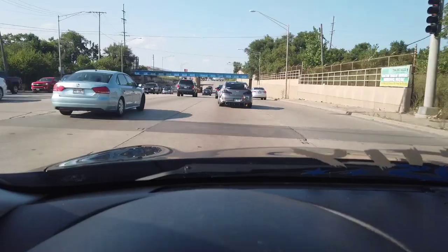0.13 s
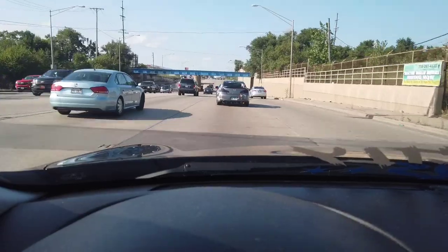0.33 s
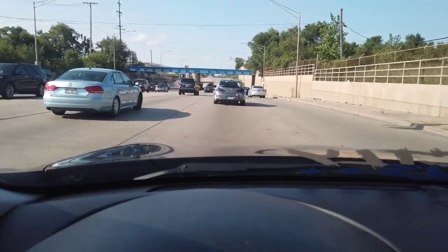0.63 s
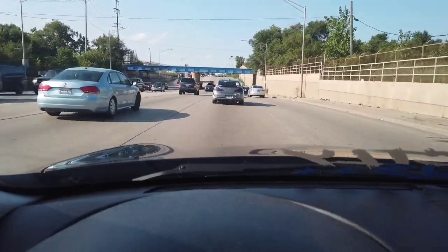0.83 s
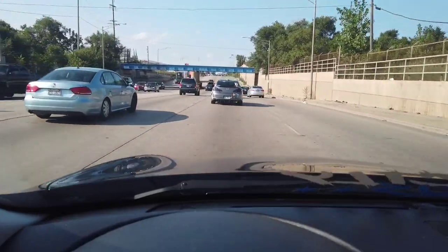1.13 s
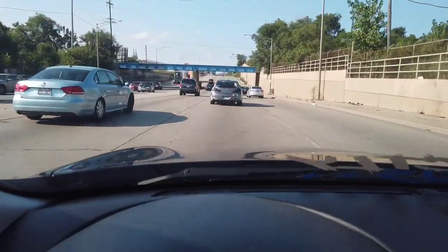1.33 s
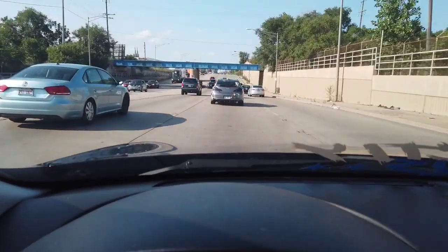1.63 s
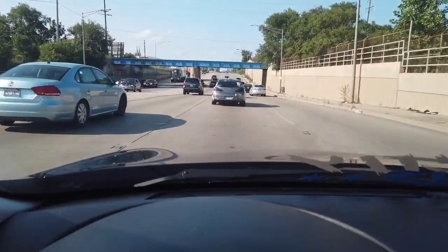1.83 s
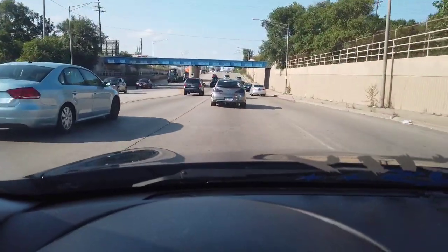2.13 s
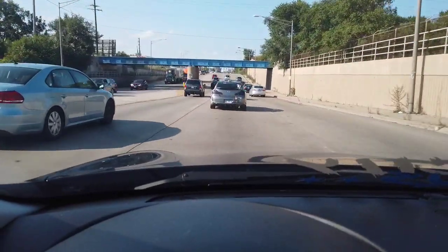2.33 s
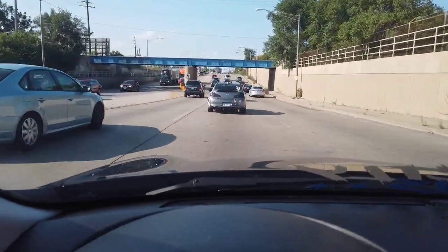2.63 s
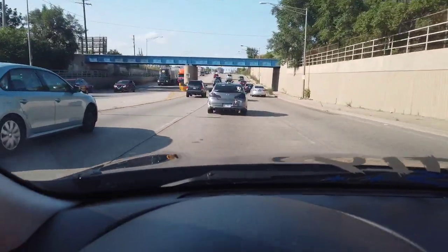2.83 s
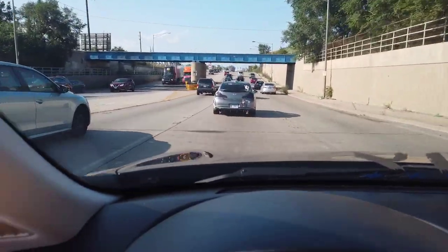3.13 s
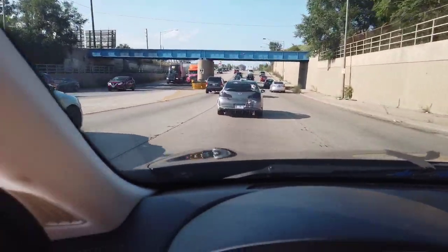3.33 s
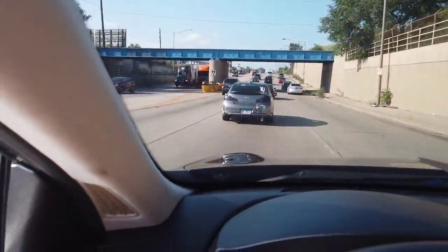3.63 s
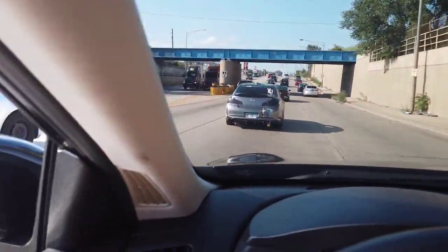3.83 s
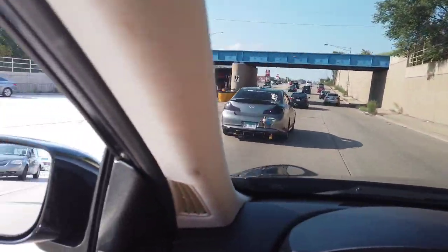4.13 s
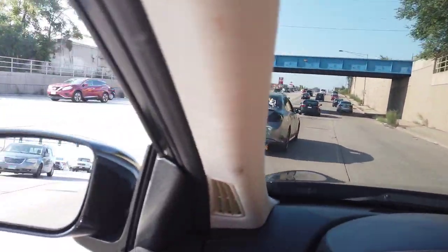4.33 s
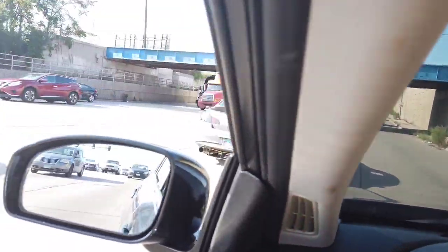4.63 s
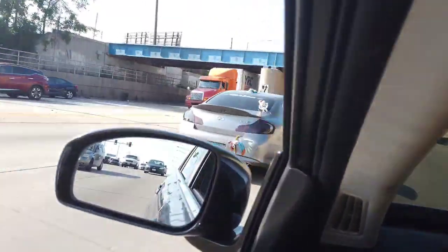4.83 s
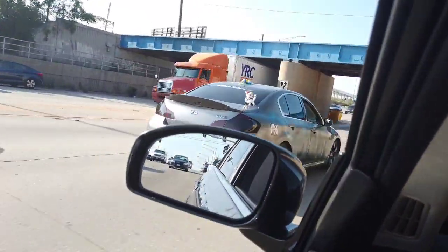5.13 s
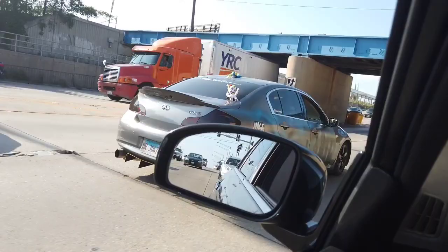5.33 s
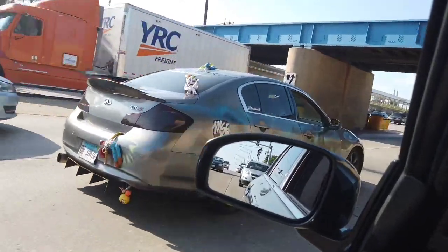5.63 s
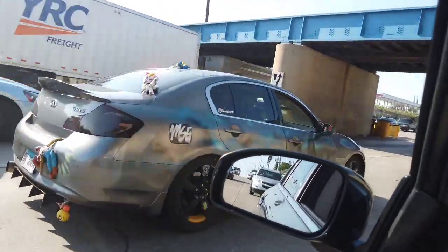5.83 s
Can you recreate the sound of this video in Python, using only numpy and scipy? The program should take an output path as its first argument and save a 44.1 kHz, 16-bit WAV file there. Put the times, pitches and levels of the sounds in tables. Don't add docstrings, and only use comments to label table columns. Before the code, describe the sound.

Heard from inside a car with the window open on a busy road: a smooth low engine drone climbs, drops away as the throttle closes, then briefly pulls again. Wind buffets and tyres roar throughout. A short high brake squeak and trim knocks follow; a second car's steady exhaust tone grows, then revs hard with a rasp, while a lorry whistles faintly and puffs air. Handheld stereo microphone turning towards the window.

```python
import sys
import numpy as np
from scipy import signal
from scipy.fft import rfft, irfft
from scipy.io import wavfile
from scipy.ndimage import uniform_filter1d

SR = 44100
rng = np.random.default_rng(int(sys.argv[2]) if len(sys.argv) > 2 else 0)


def gain_from_db(level_db):
    decades = np.asarray(level_db, float) / 20
    return 10 ** decades


def output_pcm(signal):
    pcm = np.clip(np.atleast_2d(signal).T, -1, 1) * 32767
    wavfile.write(sys.argv[1], SR, np.round(pcm).astype(np.int16))


N = 264600

# (time [s], firing rate [Hz], firing tone [dB], throttle [0-1])
DRONE_PULLS = [
    [(0.0, 128.7, -14.5, .9), (0.12, 134, -15, .9), (0.29, 136, -14, 1), (0.48, 143.5, -12, .6),
     (1.38, 150, -13.3, .2), (1.5, 146.6, -13.5, .1), (1.57, 138, -21.5, 0), (1.8, 131.8, -27, 0),
     (2.25, 130.8, -42, 0)],
    [(2.75, 93.3, -46, .2), (2.84, 102.8, -28.5, .2), (2.95, 113.5, -22, .6), (3.2, 135.1, -15.5, 1.05),
     (3.38, 143.3, -14.3, .9), (3.5, 141.5, -14, .85), (3.57, 139, -16.5, .6), (3.65, 128.2, -26, .25),
     (3.83, 126.1, -53, 0)],
]
# (frequency [Hz], level [dB])
CABIN_RESPONSE = [(200, -8), (250, -26), (300, -29), (370, -25), (405, -20.5), (425, -29), (575, -29.5),
                  (600, -33)]
# (time [s], firing tone [dB])
CRUISE_LEVEL = [(0.0, -26), (0.2, -39), (0.65, -48), (0.95, -35), (2.62, -35), (2.76, -27), (3.2, -29.5),
                (3.4, -36), (3.7, -31), (4.38, -29), (4.47, -22.5), (4.74, -17.5), (5.015, -16.5),
                (5.028, -28), (5.1, -27), (5.165, -35)]
# (time [s], firing rate [Hz], firing tone [dB], pipe pressure [0-1])
REV_COURSE = [
    (5.18, 165.9, -15.5, .1),
    (5.215, 171, -14, .2),
    (5.245, 176, -15, 1),
    (5.34, 190.9, -15.5, 1),
    (5.49, 223.5, -15, 1.05),
    (5.59, 246.4, -15.5, .62),
    (5.66, 255.3, -15.5, .4),
    (5.77, 243, -21.5, .1),
    (6.0, 226, -17.5, .1),
]
# (level [dB], lag [cycles])
BANK_TONES = [(0.1, -.175), (-11, .03)]
# (order [sixths of firing rate], level [dB])
CYLINDER_TONES = [(1, -18.5), (2, -18), (4, -9), (5, 2.1), (7, -3), (8, -3.5), (9, -8), (10, -11),
                  (11, -4.5), (13, -9), (14, -17)]
# (frequency [Hz], level [dB])
PIPE_COLOUR = [(450, -10), (600, 3), (700, 0), (800, 2.5), (900, 1), (1000, 0), (1150, -7), (1350, -28.5),
               (2000, -51)]
# (time [s], middle frequency [Hz], level [dB])
TURBO_WHISTLE = [
    (4.3, 7650, -64),
    (4.5, 7930, -58),
    (4.85, 8140, -58),
    (5.05, 8290, -56),
    (5.2, 8550, -55),
    (5.42, 8900, -54),
    (5.6, 9300, -51),
    (5.75, 9450, -52),
    (6, 9600, -58),
]
# (time [s], peak level [dB], rise [s per 10 dB], fall [s
# per 10 dB])
AIR_PUFFS = [
    (4.29, -63, .09, .2),
    (5.366, -56, .03, .03),
    (5.45, -51, .015, .1),
    (5.52, -46.5, .06, .2),
    (5.6, -47, .15, .07),
    (5.68, -55, .05, .2),
]
# (frequency [Hz], density [dB per Hz])
RELEASE_COLOUR = [(2060, -26.5), (3500, -10.5), (4340, -13), (6360, -5), (9080, -3.5), (11000, -4.5),
                  (12400, -2), (13600, -5.5), (15200, -6)]
# (time [s], peak level [dB], rise [s per 10 dB], fall [s per 10 dB])
BRAKE_SQUEAK = [
    (4.1, -56, .025, .035),
    (4.158, -45, .032, .03),
    (4.2, -59, .01, .2),
]
# (time [s], peak level [dB], ring [Hz], t60 [s])
TRIM_KNOCKS = [
    (2.405, -23, 959, 0.047),
    (4.652, -14, 830, 0.035),
    (4.707, -22.5, 739, 0.068),
    (5.229, -20, 684, 0.04),
               (3.447, -51, 5250, .04),
    (3.932, -28, 900, .03),
    (4.885, -28, 660, .04),
    (4.925, -28, 780, .04),
    (4.962, -27, 810, .04),
]
# (time [s], peak level [dB], rise and fall [s per 10 dB])
WINDOW_GUSTS = [(.36, -20.5, .22), (.52, -22, .12), (.85, -23, .2), (1.05, -17.5, .05), (1.27, -19, .08),
                (1.53, -22.5, .12), (1.75, -19.5, .1), (2.3, -23, .3), (2.54, -18.5, .09), (2.74, -20, .08),
                (2.96, -17.5, .13), (3.09, -20, .15), (3.37, -18, .14), (3.77, -20, .15),
                (3.95, -21.5, .25), (4.38, -22.5, .2), (4.85, -25, .4), (5.18, -26, .4)]
# (frequency [Hz], density [dB per Hz])
BUFFET_COLOUR = [(8.8, -30), (15, -3.5), (38, -7), (56, -9.5), (76, -18.5), (108, -21), (130, -17.5),
                 (170, -41), (290, -120)]
# (time [s], tyre roar [dB])
TRAFFIC_LEVEL = [
    (0, -38.5),
    (.6, -41.5),
    (2.1, -41.5),
    (2.9, -39),
    (3.75, -36.5),
    (4.3, -34.5),
    (4.7, -32.5),
    (5.2, -34.5),
    (5.27, -38.5),
    (6, -38.5),
]
# (frequency [Hz], density [dB per Hz])
TYRE_COLOUR = [(53, -32), (90, -8.5), (123, -9), (179, -2.5), (277, -22), (354, -15.5), (478, -21.5),
               (884, -19), (982, -17.5), (1320, -21.5), (1850, -23), (2320, -28.5), (2820, -32),
               (3670, -47.5), (6000, -55), (7800, -88.5), (13200, -120)]
# (frequency [Hz], density [dB per Hz])
INTAKE_COLOUR = [(2650, -35.5), (4500, -5.5), (5330, -10), (6270, -9.5), (7200, -6.5), (7810, -1),
                 (8560, 0.5), (10900, -9.5), (12000, -8.5), (13400, -4), (15200, -14.5)]
# (frequency [Hz], density [dB per Hz])
STREET_COLOUR = [(2060, -35), (3500, -8), (5380, -9), (5900, -9), (7100, -5), (8130, -4.5), (9030, -7),
                 (10600, -12), (13100, -11), (15200, -15)]
# (time [s], peak level [dB], rise [s per 10 dB], fall [s per 10 dB])
DRAUGHT_GUSTS = [
    (1.1, -48, 1, 1),
    (3.5, -36, .35, .2),
    (4.35, -40.5, .3, .35),
]
# (frequency [Hz], density [dB per Hz])
PORT_COLOUR = [(15, -1), (50, -4.5), (110, -12), (250, -31.5), (500, -73)]
# (frequency [Hz], likeness [0-1])
LIKENESS = [(60, 1), (110, .995), (200, .995), (380, 1), (690, 0.97), (1280, 0.95), (2360, 0.86),
            (4350, 0.13), (8020, 0.14), (14800, 0.35)]


def evened(x):
    return x / np.sqrt(np.mean(x ** 2) + 1e-20)


def blend(ends, share):
    return ends[0] + (ends[1] - ends[0]) * share


def read(points, hz):
    f, value = np.transpose(points)
    return np.interp(np.log(hz + 1), np.log(f + 1), value)


def follow(rows):
    s, *columns = np.transpose(rows)
    t = np.arange(N) / SR
    gate = uniform_filter1d(1. * (t >= s[0]) * (t <= s[-1]), size=300, mode="nearest")
    return gate, [np.interp(t, s, c) for c in columns]


def swells(rows, floor_db=-120):
    t = np.arange(N) / SR
    peaks = []
    for s, db, *slopes in rows:
        peaks.append(db - 10 * np.maximum((s - t) / slopes[0], (t - s) / slopes[-1]))
    return np.maximum(np.max(peaks, axis=0), floor_db)


def wander(hz):
    lowpass = signal.butter(2, hz, fs=SR / 64, output="sos")
    coarse = signal.sosfilt(lowpass, rng.standard_normal(N // 64 + 2))
    return evened(np.interp(np.arange(N) / 64, np.arange(len(coarse)), coarse))


def noise(spectrum, patchy_db, flicker_db, size=1024):
    frames, hz = 4 * N // size + 5, np.fft.rfftfreq(size, 1 / SR)
    a, b, c, d, patches = rng.standard_normal((frames, len(hz), 5), dtype=np.float32).T
    patches = uniform_filter1d(patches, size=10, axis=0)
    patches = evened(uniform_filter1d(patches, size=10, axis=1))
    same = np.clip(read(LIKENESS, hz), 0, 1)[:, None]
    mid = np.sqrt(1 + same) * (a + 1j * b)
    side = np.sqrt(1 - same) * (c + 1j * d)
    flicker = flicker_db * rng.standard_normal(frames)
    level_db = read(spectrum, hz)[:, None] + patchy_db * patches + flicker
    z = np.array([mid + side, mid - side]) * gain_from_db(level_db)
    return evened(signal.istft(z, nperseg=size, noverlap=3 * size // 4)[1][:, :N])


def resonate(x, hz, width_hz):
    turn = np.exp(2j * np.pi * np.cumsum(hz * np.ones(N)) / SR)
    r = np.exp(-np.pi * width_hz / SR)
    smooth = signal.lfilter([1], [1, -2 * r, r * r], x * turn.conj())
    return evened((turn * smooth).real)


def tone(turns, db, rough_db, lag=None):
    lag = rng.random() if lag is None else lag
    strength = np.sqrt(2) * gain_from_db(db + rough_db * wander(33))
    return strength * np.cos(2 * np.pi * (turns - lag))


def cycle_tones(turns, below_db, above_db):
    out = np.zeros(N)
    for k, db in CYLINDER_TONES:
        out += tone(k / 6 * turns, db + (below_db if k < 6 else above_db), 0.98)
    return out


def drone():
    pulls_db, overtone_follow = (-2, -3.5), .8
    climb_db, shut_db, broken_db = .3, 10, 1.5
    bank_shut_db, bank_open_db = -50, -33
    out = np.zeros(N)
    for rows, pull_db in zip(DRONE_PULLS, pulls_db):
        gate, (hz, first_db, opening) = follow(rows)
        turns = np.cumsum(hz * (1 + .002 * wander(20))) / SR
        load_db = overtone_follow * (first_db + 13) - 13 + pull_db
        climb_hz_per_s = uniform_filter1d(np.gradient(hz) * SR, size=3000)
        load_db += np.clip(climb_db * (climb_hz_per_s - 7), -5, 1.5)
        load_db -= shut_db * np.clip(1 - opening / .12, 0, 1)
        firing = tone(turns, first_db, 0.87)
        for k in (2, 3, 4):
            overtone_db = load_db + read(CABIN_RESPONSE, k * hz) + broken_db * wander(4)
            firing += tone(k * turns, overtone_db, 0.7 * k)
        bank_db = blend((bank_shut_db, bank_open_db), opening)
        banks = tone(3 / 2 * turns, np.minimum(bank_db, first_db - 18.5), 2.4)
        banks += tone(5 / 2 * turns, bank_db - 12.5, 2.5)
        out += gate * (firing + banks + tone(5 * turns, load_db - 43.0, 5.0))
    return out


def throttle():
    return sum(gate * columns[-1] for gate, columns in map(follow, DRONE_PULLS))


def rev():
    cut_s, cut_length_s, cut_edge_s = 5.652, .108, .012
    cut_loss_db, cut_bank_db, even_bank_db = -4.5, -15, -46
    after_bank_db, settle_db_per_s = -29, 30
    peaked_db, rasp_ends_db = (-35, -22), (-57, -36.5)
    uneven_ends_db = (-35, -30)
    gate, (hz, first_db, pressure) = follow(REV_COURSE)
    since = np.arange(N) / SR - cut_s
    began = np.clip(since / cut_edge_s + .5, 0, 1)
    ended = np.clip((since - cut_length_s) / cut_edge_s + .5, 0, 1)
    cut = began - ended
    first_db = first_db + cut_loss_db * cut
    second_db = blend(peaked_db, pressure) + 3.0 * cut
    rasp_db = blend(rasp_ends_db, pressure) - 1.5 * cut
    settling_db = after_bank_db - settle_db_per_s * (since - cut_length_s)
    bank_db = (1 - began) * even_bank_db + cut * cut_bank_db + ended * settling_db
    turns = np.cumsum(hz * (1 + .003 * wander(25))) / SR
    out = tone(turns, first_db, 0.21, lag=0) + tone(2 * turns, second_db, 1.7, lag=0)
    out += gain_from_db(rasp_db + 9.0) * rasp(turns)
    for k, (db, lag) in enumerate(BANK_TONES):
        out += tone((k + .5) * turns, bank_db + db, .7, lag)
    out += cycle_tones(turns, blend(uneven_ends_db, ended), second_db / 2 - 21.0 + 3.0 * ended)
    return gate * out


def rasp(turns):
    jitter_samples, spread_db, echo_s = 9.0, 3.5, .0062
    fired = np.flatnonzero(np.diff(np.floor(turns + .1)) > 0)
    chance = rng.uniform(-0.91, 1, (len(fired), 2))
    at = np.clip(fired + (jitter_samples * chance[:, 0]).astype(int), 0, N - 1)
    cracks = np.zeros(N)
    cracks[at] = gain_from_db(spread_db * chance[:, 1])
    cracks += .3 * np.roll(cracks, round(echo_s * SR))
    puffs = .085 * np.exp(-((turns + .1) % 1) / .4) * rng.standard_normal(N)
    pipe = gain_from_db(read(PIPE_COLOUR, np.fft.rfftfreq(N, 1 / SR)))
    return evened(irfft(rfft(cracks + puffs) * pipe, N))


def cruise():
    start_hz, sag_hz_per_s = 205, 9.7
    second_base_db, second_follow, uneven_base_db, lope_db = -24.5, .72, -37.5, 2
    gate, (first_db,) = follow(CRUISE_LEVEL)
    hz = start_hz - sag_hz_per_s * np.arange(N) / SR
    turns = np.cumsum(hz * (1 + .001 * wander(20))) / SR
    uneven_db = uneven_base_db + 0.3 * (first_db + 27) + lope_db * wander(3)
    uneven_db = np.minimum(uneven_db, first_db - 2.5)
    second_db = second_base_db + second_follow * first_db + lope_db * wander(3)
    out = tone(turns, first_db, 0.83) + tone(2 * turns, second_db, 2.0)
    return gate * (out + cycle_tones(turns, uneven_db, uneven_db - 6.5))


def lorry():
    split_ends_hz = [480, 60]
    strand_db, strand_sway_db = -4, 2
    breath = rng.standard_normal((2, N))
    breath = breath + 0.37 * breath[::-1]
    gate, (hz, db) = follow(TURBO_WHISTLE)
    split_hz = np.interp(hz, [hz[0], hz[-1]], split_ends_hz)
    upper = gain_from_db(strand_db + strand_sway_db * wander(4)) * resonate(breath, hz + split_hz / 2, 300)
    lower = resonate(breath, hz - split_hz / 2, 380)
    whistle = gate * gain_from_db(db + 0.99 * wander(40)) * (upper + lower)
    puff = gain_from_db(swells(AIR_PUFFS) + 5.0) * noise(RELEASE_COLOUR, patchy_db=2.0, flicker_db=0.0, size=512)
    squeak = resonate(breath, 7070, 220) + gain_from_db(-20.5) * resonate(breath, 14150, 300)
    chatter = gain_from_db(swells(BRAKE_SQUEAK) + 1.0 + 2.1 * wander(60))
    return whistle + puff + chatter * squeak


def knocks():
    out, t = np.zeros(N), np.arange(3000) / SR
    for s, db, hz, t60 in TRIM_KNOCKS:
        ring = gain_from_db(db - 60 * t / t60) * (1 - np.exp(-t / 0.0012)) * np.sin(2 * np.pi * hz * t)
        out[round(s * SR):][:len(t)] += 1.26 * ring
    return out


def buffeting():
    gusts = np.tanh(.9 * noise(BUFFET_COLOUR, patchy_db=.1, flicker_db=.1, size=4096))
    gusts = signal.sosfiltfilt(signal.butter(3, 110, fs=SR, output="sos"), gusts)
    return gain_from_db(swells(WINDOW_GUSTS, floor_db=-33)) * evened(gusts)


def tyres(roar_db):
    whine_db, whine_follow = -50.5, .65
    tread = noise(TYRE_COLOUR, patchy_db=0.94, flicker_db=0.7)
    roar = signal.sosfiltfilt(signal.butter(2, 2000, fs=SR, output="sos"), tread)
    whine = gain_from_db(whine_db + whine_follow * (roar_db + 40) + 17.0) * (tread - roar)
    return gain_from_db(roar_db + 6.0) * roar + whine


def hiss(roar_db):
    intake_ends_db = (-72.5, -64)
    street_base_db, street_follow, street_db_per_s = -64, .1, 4
    t = np.arange(N) / SR
    facing = np.clip((t - 4.05) / .2, 0, 1)
    intake_db = blend(intake_ends_db, throttle())
    street_db = street_base_db + street_follow * (roar_db + 40) + street_db_per_s * (t - 4.6)
    intake = gain_from_db(intake_db + 8.5) * noise(INTAKE_COLOUR, patchy_db=2.0, flicker_db=-0.5, size=512)
    street = gain_from_db(street_db + 7.5) * noise(STREET_COLOUR, patchy_db=0.1, flicker_db=1.2, size=512)
    return np.sqrt(1 - facing) * intake + np.sqrt(facing) * street


def air():
    roar_db = follow(TRAFFIC_LEVEL)[1][0]
    return buffeting() + tyres(roar_db) + hiss(roar_db)


def draught():
    lumps_db = swells(DRAUGHT_GUSTS, floor_db=-55) + 4.0 * wander(8)
    gust = gain_from_db(lumps_db) * noise(PORT_COLOUR, patchy_db=4.2, flicker_db=0.0, size=2048)[0]
    return np.array([gust, -gust])


def scene():
    engines = drone() + cruise() + rev() + knocks()
    door = signal.butter(3, [300, 620], "band", fs=SR, output="sos")
    side = 0.049 * signal.sosfilt(door, engines)
    return np.array([engines + side, engines - side]) + air() + draught() + lorry()


def roll_off(x):
    return signal.sosfilt(signal.butter(12, 15380, fs=SR, output="sos"), x)


def record(dry):
    ease_s, edge_hz = .004, 15450
    eased = dry * np.sin(np.pi / 2 * np.minimum(np.arange(N) / (ease_s * SR), 1)) ** 2
    lowpass = signal.firwin(511, edge_hz, window=("kaiser", 9), fs=SR)
    limited = signal.oaconvolve(eased, lowpass[None], "same")
    return roll_off(limited)


dry = scene()
out = record(dry)
output_pcm(out)
```